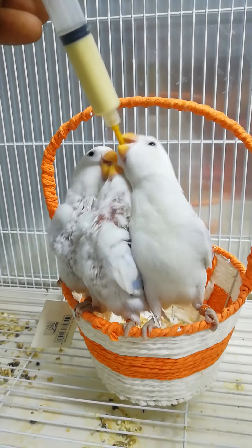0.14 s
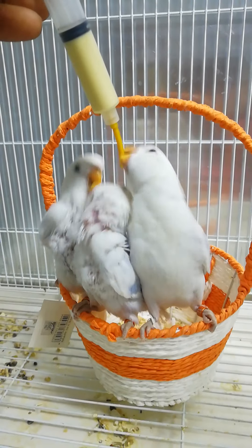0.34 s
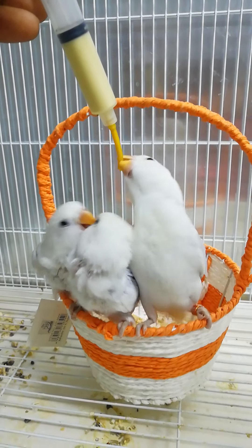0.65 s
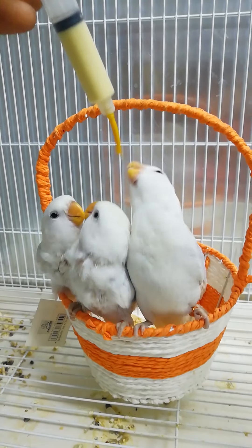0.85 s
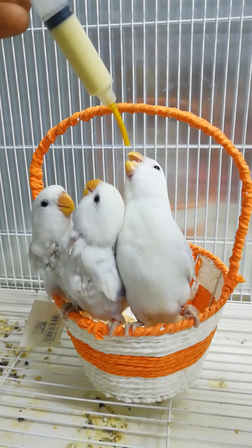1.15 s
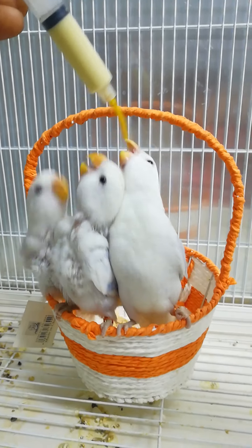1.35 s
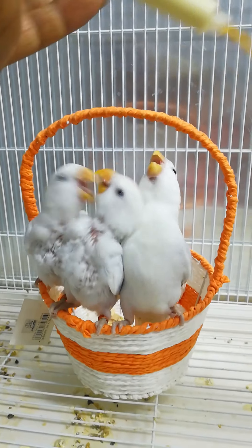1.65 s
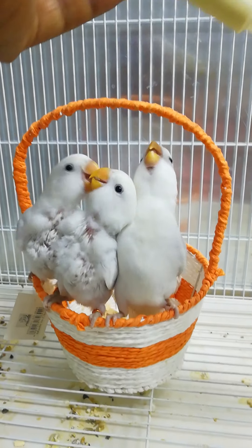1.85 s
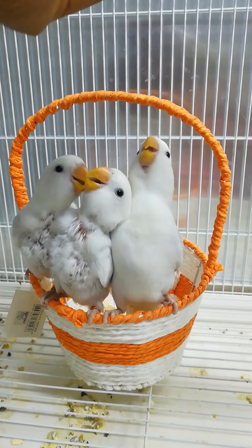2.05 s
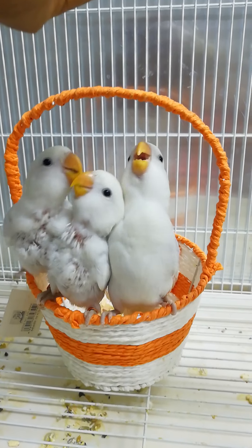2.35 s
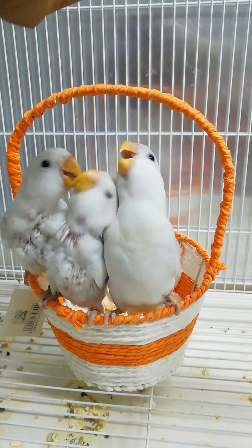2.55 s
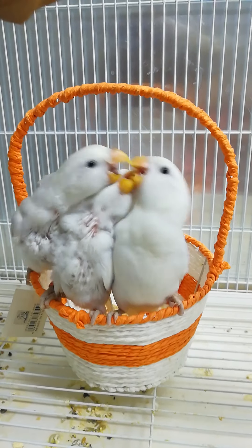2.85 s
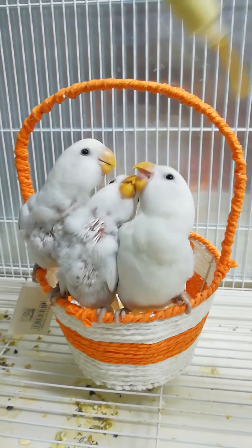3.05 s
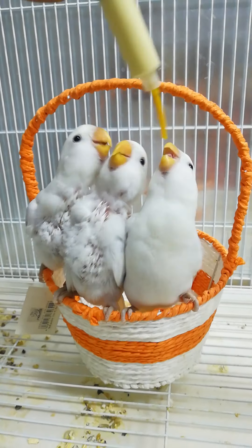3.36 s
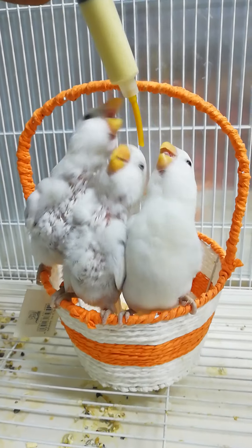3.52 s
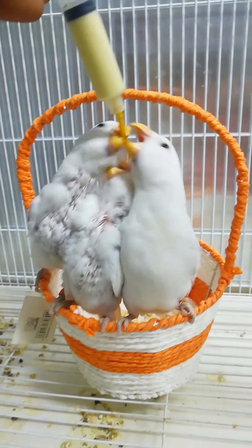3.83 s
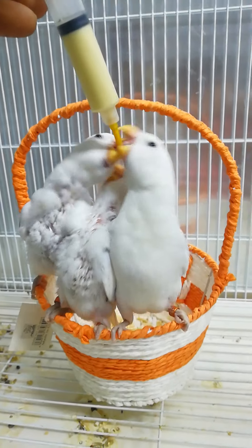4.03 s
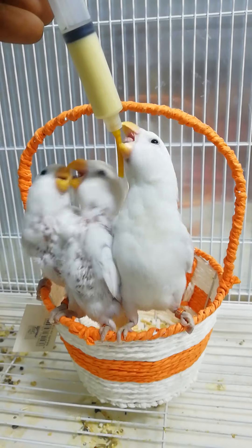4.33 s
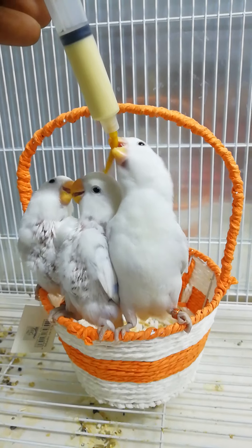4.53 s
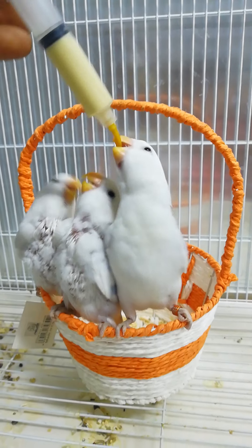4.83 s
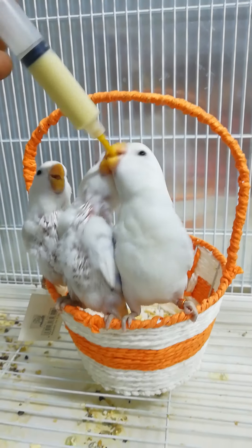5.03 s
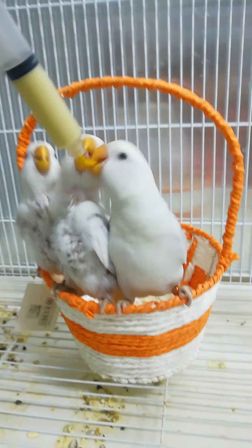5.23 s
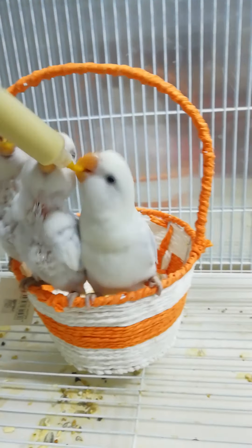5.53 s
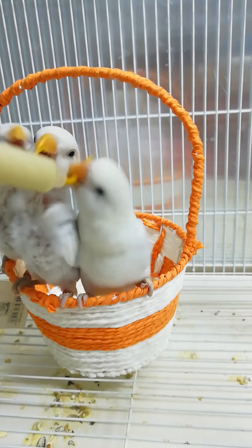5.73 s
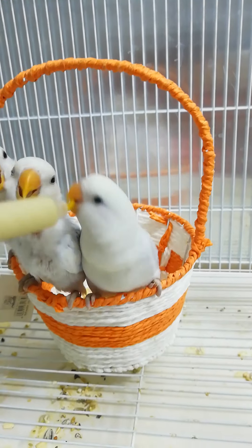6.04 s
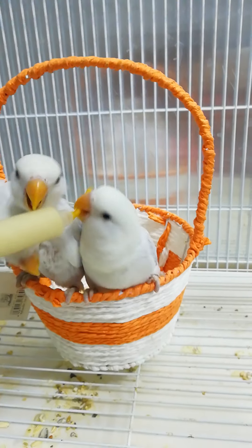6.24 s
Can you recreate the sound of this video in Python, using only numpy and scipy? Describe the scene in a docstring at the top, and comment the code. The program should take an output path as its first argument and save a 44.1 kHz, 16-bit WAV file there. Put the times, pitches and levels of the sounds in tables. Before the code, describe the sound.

Lovebird chicks call almost nonstop in a small hard-walled room, over faint air and a low hum. Their hoarse begging is close to the stereo microphones and nearly dry, flipping between a rasp and a thin squeak; whistles, chirps and squeals ring off the walls.

A soft whistle and a few faint beak ticks open, with seven quick falling chirps from about 0.3 to 1.5 seconds. Begging starts at 0.6. Gliding whistles near 2 seconds lead into a screech, and the begging is densest until about 3.3. A warble at 3 seconds ends in a shrill yelp. Squeaks, scattered chirps and a short rising whistle follow around 4 seconds. Two louder rising whistles come at 5.1 and 5.5, a sharp peep at 5.7, and a cluster of torn, piercing squeals around 6. Now and then the chicks shuffle very softly.

```python
"""Gliding whistles and falling chirps ring through a small hard-walled room, over a low hum. Lovebird chicks
are being fed from a syringe in a wire cage. Close to the stereo microphones, beaks tick and hoarse begging
calls flip between a rasp and a thin squeak up to an octave higher; the chicks shuffle. Each voice is a
vibrating syrinx; a slower second vibration roughens the begging and tears the shrill squeals. The whistles and
chirps arrive mostly off the walls."""
import sys
import numpy as np
from scipy import signal
from scipy.fft import rfft, irfft, next_fast_len
from scipy.io import wavfile
from scipy.ndimage import uniform_filter1d, map_coordinates

SR = 44100
rng = np.random.default_rng(int(sys.argv[2]) if len(sys.argv) > 2 else 0)


def unload_wav(signal):
    """Save mono or channel-first audio to the path in sys.argv[1] as 16-bit WAV at rate SR, clipped to [-1, 1]."""
    wavfile.write(
        sys.argv[1],
        SR,
        np.round(np.clip(np.atleast_2d(signal).T, -1, 1) * 32767).astype(np.int16),
    )


N = 281358
TOP_HZ = 15720
# The open beak lifts an overtone that sweeps through it. Each row: frequency in Hz, gain in dB.
BEAK_RESONANCE = [(3000, -1.5), (4300, 3), (5800, -19)]


def amp(db):
    return 10 ** (np.asarray(db) / 20)


def unit(x):
    return x / np.sqrt(np.mean(x ** 2) + 1e-20)


def along(points, hz):
    """Read (Hz, value) points on a log frequency axis."""
    f, v = np.transpose(points)
    return np.interp(np.log(hz + 1), np.log(f + 1), v)


def curves(rows):
    """One value per sample of a call for each column after the time."""
    s, *cols = np.transpose(rows)
    t = s[0] + np.arange(max(int((s[-1] - s[0]) * SR), 64)) / SR
    return [np.interp(t, np.maximum.accumulate(s), c) for c in cols]


def progress(length):
    """Runs from 0 to 1 through a note."""
    return np.linspace(0, 1, int(length * SR))


def wobble(rate, size):
    """A smooth random curve, rate knots a second."""
    return map_coordinates(rng.standard_normal(int(size * rate / SR) + 4), [np.arange(size) * rate / SR])


def filtered(x, response):
    """x times a complex response of frequency."""
    n = x.shape[-1]
    m = next_fast_len(n + 4096)
    return irfft(rfft(x, m) * response(np.fft.rfftfreq(m, 1 / SR)), m)[..., :n]


def noise(n, spectrum):
    """Noise of unit power, coloured by (Hz, dB) points."""
    return unit(filtered(rng.standard_normal(n), lambda f: amp(along(spectrum, f))))


def add(track, s, sound, edge=0.0024):
    """Lay a sound into a track with short ramps at its ends."""
    i, start = np.arange(len(sound)), max(round(s * SR), 0)
    ramped = sound * np.minimum(np.minimum(i, i[::-1]) / (edge * SR), 1)
    track[start:start + len(sound)] += ramped[:max(N - start, 0)]


def cycle(hz, jitter, rate):
    """Phase of a vibration whose pitch trembles."""
    return 2 * np.pi * np.cumsum(hz * (1 + jitter * wobble(rate, len(hz)))) / SR


def pipe(phase, hz, second_db, third_db, slope_db):
    """A nearly pure voice: a fundamental, a second harmonic and a fading series above."""
    levels = [0 * hz, second_db] + [second_db + third_db + k * slope_db for k in range(4)]
    gains = [amp(db) * (k * hz < TOP_HZ) for k, db in enumerate(levels, 1)]
    tone = sum(g * np.sin(k * phase) for k, g in enumerate(gains, 1))
    return tone / np.sqrt(sum(g ** 2 for g in gains) / 2)


def room(x, wet_db, lead_ms, gap_s=0.0024):
    """The direct sound reaches the left microphone lead_ms early; the walls answer each side its own way."""
    # Each row: frequency in Hz, seconds for the room to fall 60 dB.
    decay = [(500, 0.37), (2000, 0.17), (5000, 0.19), (12000, 0.085)]
    hz, t, spectra = signal.stft(rng.standard_normal((2, SR // 2)), SR, nperseg=256)
    tail = signal.istft(spectra * amp(-60 * t / along(decay, hz)[:, None]), SR, nperseg=256)[1]
    tail = np.pad(tail / np.linalg.norm(tail[0]), ((0, 0), (int(gap_s * SR), 0)))
    direct = filtered(x, lambda f: np.exp(1j * np.pi * f * lead_ms / 1000 * np.array([[1], [-1]])))
    walls = signal.fftconvolve(x[None], tail, axes=1)[:, :N]
    return (direct + amp(wet_db) * walls) / np.hypot(1, amp(wet_db))


def room_tone(air_db=-59, hum_db=-68, hum_hz=67):
    """Faint air, centred in the bass and wide above, and a wavering low hum."""
    # Each row: frequency in Hz, relative level of the air in dB.
    air_spectrum = [(8, 1.5), (22, 3), (38, -9.5), (100, -13), (170, -14), (450, -22.5), (1000, -20.5),
                    (2300, -23), (5200, -28.5), (8600, -34), (15500, -40)]
    # Each row: frequency in Hz, likeness of the two microphones from 0 to 1.
    likeness = [(60, 0.97), (130, 1), (260, 0.41), (600, 0.023)]

    def spread(f):
        turn = np.arccos(np.clip(along(likeness, f), 0, 1)) / 2
        return amp(along(air_spectrum, f)) * [np.cos(turn), np.sin(turn)]

    mid, side = filtered(rng.standard_normal((2, N)), spread)
    hum = np.sin(cycle(np.full(N, hum_hz), jitter=.07, rate=14)) * amp(2.3 * wobble(9.9, N))
    return amp(air_db) * unit(np.array([mid + side, mid - side])) + amp(hum_db) * unit(hum)


def whistle(hz, db, second_db, flutter_db=3):
    """A gliding tone with a hoarse tremble that grows with effort."""
    phase = cycle(hz, jitter=np.interp(db, [-48, -28], [.012, .027]), rate=730)
    tone = pipe(phase, hz, second_db + along(BEAK_RESONANCE, 2 * hz), third_db=-19, slope_db=-11.5)
    return amp(db + flutter_db * wobble(188.4, len(hz))) * tone


def whistles(rise_db=7, fall_db=13):
    """Each whistle swells to a crest while gliding in an S from one pitch to another."""
    # Each row: start and length in seconds, first and last pitch in Hz, crest level in dB,
    # crest position as a share of the length, second harmonic in dB before the beak.
    notes = [ (0, 0.085, 1057, 1292, -42.5, 0.076, -10.5), (0.158, 0.068, 1645, 1885, -54, .3, -6),
             (0.606, 0.084, 1705, 2280, -40, 0.49, -24), (0.836, 0.041, 2030, 2226, -35, 0.66, -18),
             (1.757, 0.055, 1063, 2100, -41.5, 0.68, -38), (1.894, 0.079, 1287, 1143, -47.5, .35, -36),
             (1.933, 0.12, 1514, 1759, -35.5, 0.47, -5), (1.972, .195, 1241, 1662, -36, .3, -15),
             (2.284, 0.16, 1415, 1264, -51, 0.32, -16), (3.472, 0.085, 1326, 1135, -39.5, 0.18, -10.5),
             (5.097, .123, 2420, 3328, -23, .45, -5), (5.461, 0.026, 2594, 2710, -28, 0.98, -14),
             (5.497, 0.12, 2268, 3323, -22.5, .52, -8), (5.76, 0.075, 1100, 1792, -39.5, 0.66, -5.5)]
    track = np.zeros(N)
    for s, length, from_hz, to_hz, db, crest, second_db in notes:
        u, crest = progress(length), np.clip(crest, .05, .95)
        bend = np.tanh((u - crest + .22) / .3)  # steepest just before the crest
        hz = np.interp(bend, bend[[0, -1]], [from_hz, to_hz])
        rising, falling = 1 - u / crest, (u - crest) / (1 - crest)
        below_db = np.where(u < crest, rise_db * rising ** 2, fall_db * falling ** 2)
        add(track, s, whistle(hz, db - below_db, second_db))
    return track


def beak_ticks(trim_db=-2.5, t60=0.047):
    """Beaks tick: small bright snaps that die at once."""
    # Each row: start in seconds, level in dB before the trim.
    ticks = [(0.042, -53.5), (0.1333, -58), (0.4389, -64), (0.56, -47.5)]
    track, t = np.zeros(N), np.arange(SR // 30) / SR
    for s, db in ticks:
        snap = noise(len(t), [(800, -18), (4500, 0.5), (14000, -26.5)])
        add(track, s, amp(db + trim_db - 60 * t / t60) * snap, edge=0.00061)
    return track


def chirps(rise_s=.008):
    """Each chirp swells at its top pitch, then drops, roughens and dies."""
    # Each row: start of the fall and hold before it in seconds, top and end pitch in Hz,
    # fall time in seconds, level in dB before the swell, second harmonic in dB before the beak.
    notes = [ (.255, .008, 2795, 1534, .046, -29, -2.5), (.479, 0.014, 3006, 1221, 0.057, -33.5, -19.5),
             (0.689, .008, 2680, 1408, 0.046, -29.5, -2.5), (.901, .01, 2900, 1310, 0.045, -33, -21),
             (1.099, .02, 3030, 1210, 0.046, -30, -13), (1.295, 0.013, 2936, 1138, 0.052, -33.5, -14.5),
             (1.513, .012, 2893, 1273, 0.044, -31.5, -7), (3.693, .02, 3040, 1270, .04, -30, -8),
             (4.205, 0.016, 2632, 1420, 0.067, -33, -21), (4.957, 0.0075, 2470, 1610, .084, -30.5, -16),
             (5.341, .016, 2810, 1465, 0.078, -31.5, -30)]
    track = np.zeros(N)
    for s, hold, top_hz, end_hz, fall, db, second_db in notes:
        lead = hold + rise_s
        t = np.arange(-int(lead * SR), int(fall * SR)) / SR
        u = np.maximum(t / fall, 0)
        hz = end_hz + (top_hz - end_hz) * (1 - u) ** 1.6
        swell_db = np.interp(t / fall, [-lead / fall, 0, .35, .7, 1], [-13, 1.5, 3.5, -2.5, -10.5])
        phase = cycle(hz, jitter=.012 + .05 * u, rate=900)
        tone = pipe(phase, hz, second_db + along(BEAK_RESONANCE, 2 * hz), third_db=-12.5, slope_db=-15.5)
        add(track, s - lead, amp(db + swell_db) * tone)
    return track


def hoarse_voice(hz, db, rasp, slow_hz=360, flutter_db=3):
    """A syrinx buzzes through the throat; rasp shakes its pitch and wakes a slower second vibration."""
    # The throat's resonances. Each row: frequency in Hz, gain in dB.
    throat = [(300, -66), (520, -30), (700, -14), (1000, -6.5), (1400, -3.5), (1900, -3), (2850, 9),
              (3400, 0), (4200, -2), (4950, 0), (6200, -10), (7500, -13.5), (10500, -46), (13500, -44.5),
              (15500, -67.5)]
    n, rasp = len(hz), np.clip(rasp, 0, .85)
    hz = hz * (1 + (.004 + .034 * rasp) * wobble(75, n))
    phase = cycle(hz, jitter=.002 + .026 * rasp, rate=420)
    slow = cycle(np.full(n, slow_hz), jitter=.22, rate=60)
    depth = .75 * rasp ** 1.3
    tone = np.zeros(n)
    for k in range(1, int(TOP_HZ / hz.min()) + 1):
        # the slow vibration puts fitful sidebands on every harmonic and saps the lowest ones
        beat = 1 - depth / k + 2 * depth * wobble(79.75, n) * np.cos(slow + rng.uniform(0, 2 * np.pi))
        tone += beat * (k * hz < TOP_HZ) * np.cos(k * phase + rng.uniform(0, 2 * np.pi))
    tone = filtered(tone, lambda f: amp(along(throat, f)))
    tone /= np.sqrt(np.abs(uniform_filter1d(tone ** 2, size=500)) + 1e-12)  # evens out the level
    # air escapes once a cycle, brighter than the tone
    puffs = rng.standard_normal(n) * (1 + np.cos(phase))
    breath = unit(filtered(puffs, lambda f: amp(along(throat, f) + along([(6000, -8), (12000, 13.5)], f))))
    breath_share = .01 + .14 * rasp ** 2
    voice = np.sqrt(1 - breath_share) * tone + np.sqrt(breath_share) * breath
    return amp(db) * unit(voice * amp(flutter_db * rasp * wobble(335.7, n)))


def begging(rasp_per_s=2.4, drift_share=.009, sag_share=.06, sag_s=.07):
    """Each call drifts around its note and frays; the pitch sinks as the air runs out."""
    # Each row: start and length in seconds, pitch in Hz, mid-call level and swell in dB,
    # opening rasp from 0 to 1.
    calls = [ (.59, 0.33, 1031, -34.5, 15, .7), (1.001, 0.13, 1048, -37, -1, 0.62),
             (1.589, 0.16, 1061, -34, 6.5, 0.6), (2.126, 0.3, 983, -29.5, -3, 0.33),
             (2.519, 0.25, 982, -27.5, 2, 0.4), (2.849, 0.24, 985.4, -28, -0.5, 0.56),
             (3.187, 0.16, 1005, -31, 6, 1), (3.749, .212, 985, -25.5, -3.5, 0.12),
             (4.293, 0.027, 974, -40, 3, 1), (4.496, 0.026, 1058, -46.5, -15, .6),
             (4.844, .05, 996, -28, 5.5, .05), (4.948, 0.073, 973, -32, 0, 0.6),
             (5.081, .12, 982, -35.5, 4.5, .7), (5.338, 0.045, 1003, -37.5, -7, 0.08),
             (5.721, 0.11, 1096, -35.5, -1.5, 0.5), (5.936, 0.16, 978.5, -29.5, 11, 0.25),
             (6.372, .022, 1085, -39.5, -1, 0)]
    track = np.zeros(N)
    for s, length, hz, db, swell_db, rasp in calls:
        u = progress(length)
        sag = np.clip(1 - (1 - u) * length / sag_s, 0, 1)
        pitch = hz * (1 - sag_share * (sag - sag[0]) + drift_share * wobble(25.12, len(u)))
        add(track, s, hoarse_voice(pitch, db + swell_db * (u - .5), rasp + rasp_per_s * length * u))
    return track


def squeaks():
    """The begging voice flips upwards into one thin, arched slide."""
    # Each row: start and length in seconds, first pitch, last pitch and arch in Hz,
    # mid-call level and swell in dB, rasp from 0 to 1.
    slides = [ (0.877, 0.021, 2050, 2724, -1, -26, 8.5, .3), (0.904, 0.03, 2520, 1986, -1, -29.5, 3, 0.34),
              (1.449, 0.022, 1220, 1850, -7.5, -35.5, 6.5, 0),
              (1.938, 0.052, 1514, 1536, 78.5, -44.5, -5, 0.23),
              (2.037, 0.039, 1294, 1453, 12, -33, -2, .55), (2.069, .056, 2003, 1993, 139, -26.5, 2.5, 0.2),
              (2.293, 0.038, 2090, 1985, -0.5, -28.5, -6, .05),
              (2.785, 0.063, 2080, 1810, 0.5, -30, 0, 0.22), (3.663, 0.017, 1207, 1270, 3, -30.5, -1, 0.29),
              (3.675, 0.025, 1340, 1550, 2, -33.5, 6, 0.06),
              (3.701, 0.048, 1996, 2055, 15.5, -24.5, 8, 0.19),
              (4.789, 0.029, 1194, 1276, -6.5, -34.5, 0, .3), (4.827, 0.025, 1745, 2090, 21, -33, 16, 0.42),
              (4.894, 0.061, 1856, 1795, -18.5, -24.5, 0.5, 0.27),
              (5.384, .055, 1068, 1067, 109, -33, 0, .3), (5.899, 0.04, 1338, 1388, -8, -28, 10.5, 0.71)]
    track = np.zeros(N)
    for s, length, from_hz, to_hz, arch_hz, db, swell_db, rasp in slides:
        u = progress(length)
        hz = from_hz + (to_hz - from_hz) * u + arch_hz * np.sin(np.pi * u)
        add(track, s, hoarse_voice(hz, db + swell_db * (u - .5), rasp))
    return track


def shuffling(length=0.12):
    """Soft, dull swells as the chicks shift their weight."""
    # Each row: middle of the swell in seconds, level in dB.
    shuffles = [(1.358, -65.5), (2.539, -62), (2.92, -71), (3.26, -65.5), (3.409, -60.5), (4.297, -66.5),
                (5.229, -60)]
    track, swell = np.zeros(N), np.hanning(int(length * SR))
    for s, db in shuffles:
        thud = noise(len(swell), [(70, -30), (150, -7.5), (290, -9), (500, -12.5), (1500, -40)])
        add(track, s - length / 2, amp(db) * swell * thud)
    return track


def squeal(hz, db, second_db, rasp, buzz_hz=950, flutter_db=4):
    """A high, forced, warbling note; a slower vibration beats against it and tears it into a screech."""
    n = len(hz)
    hz = hz * (1 + .035 * rasp * wobble(140, n))
    tone = pipe(cycle(hz, jitter=.07 * rasp, rate=650), hz, second_db, third_db=-13, slope_db=-8)
    buzz = 1 + .84 * rasp * np.sin(cycle(np.full(n, buzz_hz), jitter=0.1492, rate=200))
    hiss = noise(n, [(1200, -38), (3000, -3.5), (5500, -5), (9000, -18), (13000, -17), (15500, -52)])
    flutter = amp(flutter_db * rasp * wobble(233.8, n))
    return amp(db) * unit((tone * buzz + .62 * rasp * hiss) * flutter)


def forced_cries():
    """Five shrill squeals, each with a rasp that slides from its first value to its last."""
    # One table a cry. Each row: time in seconds, pitch in Hz, level in dB before the cry's gain.
    screech = [(2.135, 2487, -25), (2.169, 2487, -22.5), (2.245, 2676, -25), (2.305, 2405, -27),
               (2.33, 2396, -25)]
    yelp = [(3.283, 4180, -19), (3.289, 4140, -29.5), (3.339, 3245, -32.5), (3.369, 3460, -25.5),
            (3.405, 3907, -28)]
    shriek = [(5.925, 5680, -33), (5.959, 5360, -21.5), (5.989, 5040, -24.5), (6.005, 5240, -32.5)]
    piping = [(6.002, 3640, -14), (6.012, 3810, -18), (6.068, 3782, -33), (6.075, 3750, -37)]
    squawk = [(6.07, 4620, -30), (6.112, 4666, -31), (6.15, 4140, -37.5)]
    track = np.zeros(N)

    def cry(course, gain_db, second_db, rasp):
        hz, db = curves(course)
        add(track, course[0][0], squeal(hz, db + gain_db, second_db, np.linspace(*rasp, len(hz))))

    cry(screech, gain_db=3, second_db=8.5, rasp=(.33, .62))
    cry(yelp, gain_db=4, second_db=-14.5, rasp=(.64, .065))
    cry(shriek, gain_db=2.5, second_db=-30.5, rasp=(.98, .89))
    cry(piping, gain_db=0, second_db=-23, rasp=(.17, .67))
    cry(squawk, gain_db=5.5, second_db=-22.5, rasp=(.966, .98))
    return track


def wandering_cries():
    """A warble and a hoot: longer whistles whose pitch wanders."""
    # One table a cry. Each row: time in seconds, pitch in Hz, level in dB before the cry's gain.
    warble = [(3.0, 1428, -38.5), (3.038, 1762, -32.5), (3.11, 2755, -28), (3.146, 2438, -30),
              (3.198, 2305, -22.5), (3.265, 2574, -32)]
    hoot = [(3.955, 1212, -43.5), (3.991, 1534, -45), (4.005, 1847, -38), (4.021, 2170, -27),
            (4.045, 2234, -30), (4.075, 2224, -34.5)]
    track = np.zeros(N)
    for course, gain_db, second_db in (warble, 0, -12), (hoot, 2, -17):
        hz, db = curves(course)
        add(track, course[0][0], whistle(hz, db + gain_db, second_db))
    return track


def peep(gain_db=4):
    """A short cry that starts torn and ends as a nearly pure tone."""
    # Each row: time in seconds, pitch in Hz, level in dB before the gain.
    course = [(5.651, 3470, -41), (5.667, 3507, -27), (5.679, 3059, -24), (5.705, 3638, -31),
              (5.717, 4290, -23.5), (5.731, 3377, -27.5), (5.761, 3507, -19), (5.782, 3410, -29.5)]
    track = np.zeros(N)
    hz, db = curves(course)
    rasp = np.interp(np.linspace(1, 0, len(hz)) ** 1.9, [0, 1], [.02, .6])
    add(track, course[0][0], squeal(hz, db + gain_db, second_db=-14.5, rasp=rasp))
    return track


def close_up(x):
    """Close to the microphones the chicks are nearly dry, and coloured differently on each side."""
    # Each row: frequency in Hz, left minus right in dB.
    balance = [(60, -19), (99, 28), (160, 20), (270, -4), (450, 1), (740, 4), (1220, 4.5), (2010, -1.5),
               (3330, 2), (5500, 2.5), (9080, 5.5), (15000, -3)]
    pair = room(x, wet_db=-9.5, lead_ms=.2)
    return filtered(pair, lambda f: amp(along(balance, f) * np.array([[.5], [-.5]])))


def scene():
    """Begging up close; whistles and chirps carried mostly by the room; shrill squeals break in."""
    clear = room(whistles() + chirps() + wandering_cries(), wet_db=5, lead_ms=0.515)
    close = close_up(beak_ticks() + begging() + squeaks() + peep())
    shuffles = room(shuffling(), wet_db=-3.5, lead_ms=0)
    shrill = room(forced_cries(), wet_db=3, lead_ms=0.634)
    return room_tone() + clear + close + shuffles + shrill


def record(dry):
    """The recorder keeps nothing above its band limit."""
    return filtered(dry, lambda hz: hz < TOP_HZ)


dry = scene()
out = record(dry)
unload_wav(out)
```